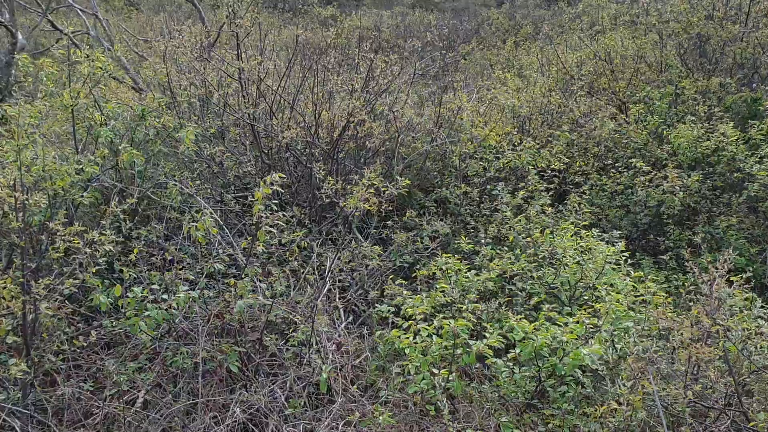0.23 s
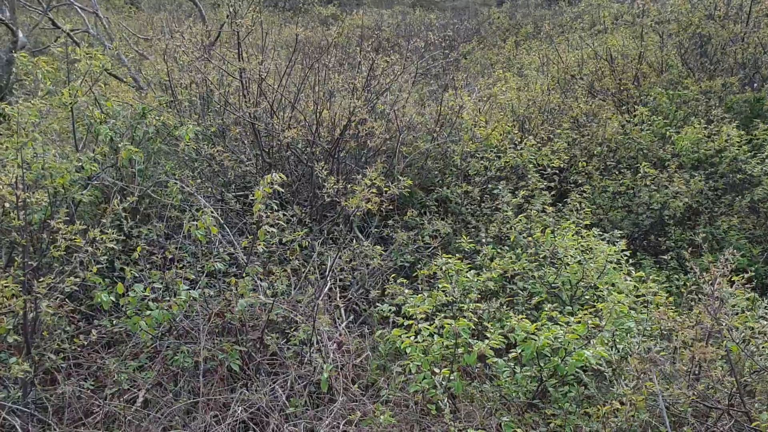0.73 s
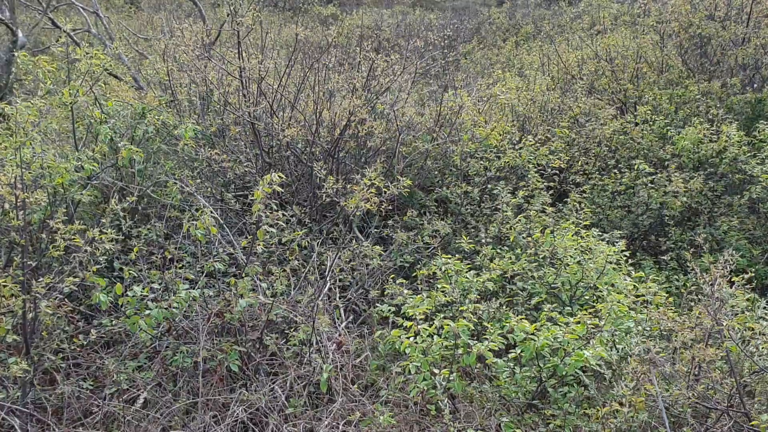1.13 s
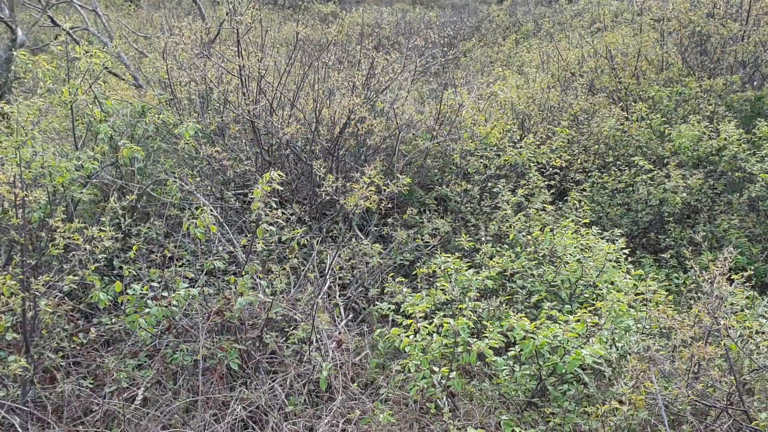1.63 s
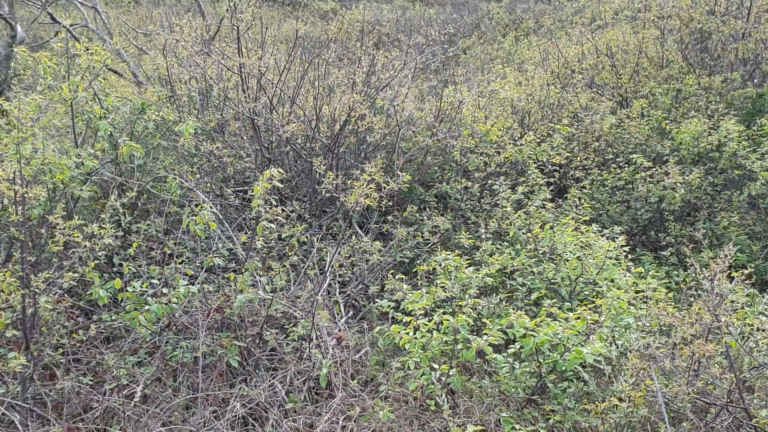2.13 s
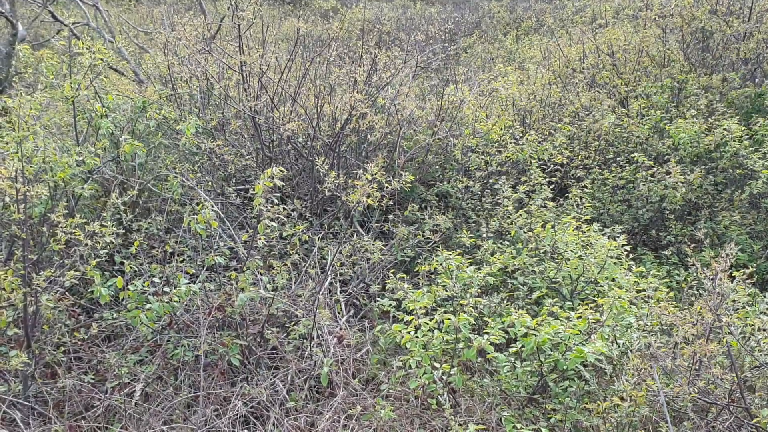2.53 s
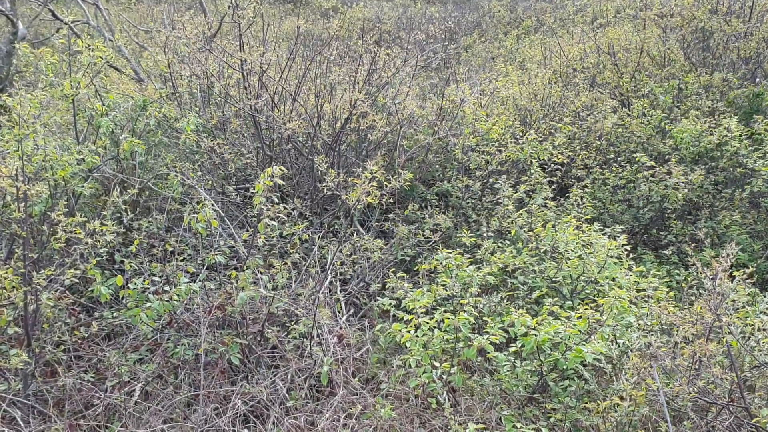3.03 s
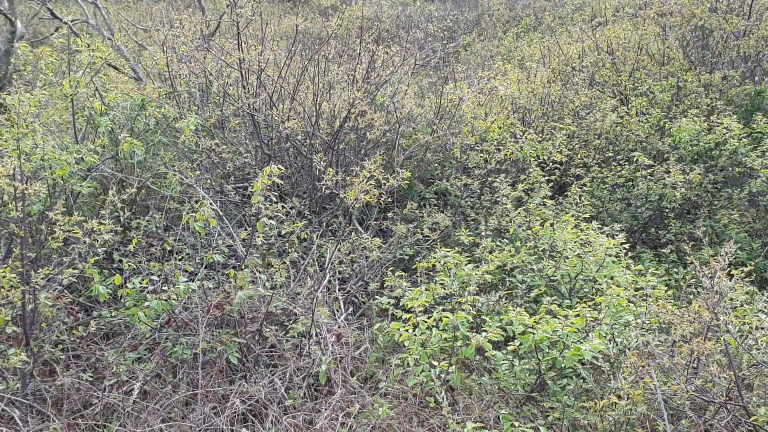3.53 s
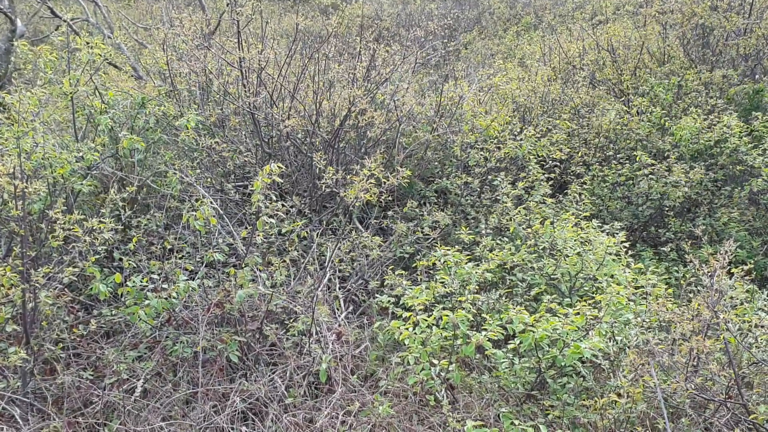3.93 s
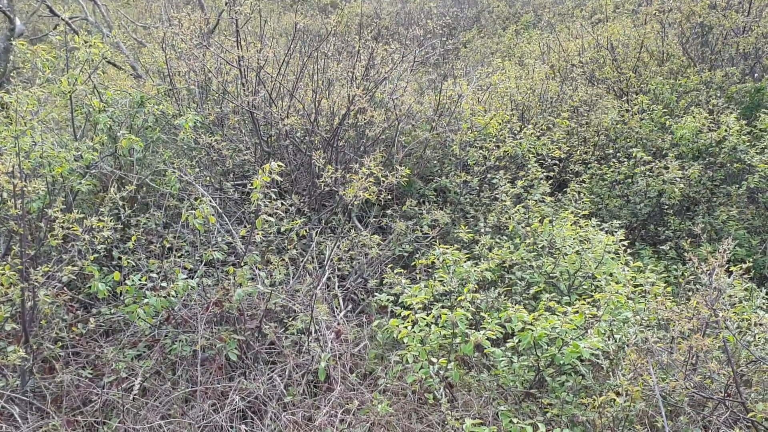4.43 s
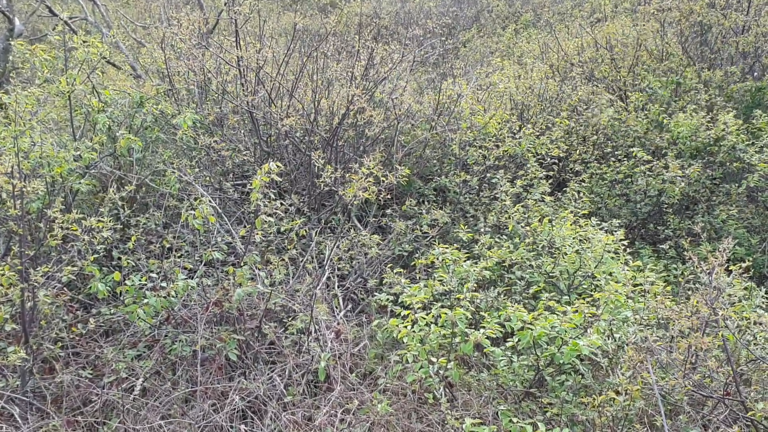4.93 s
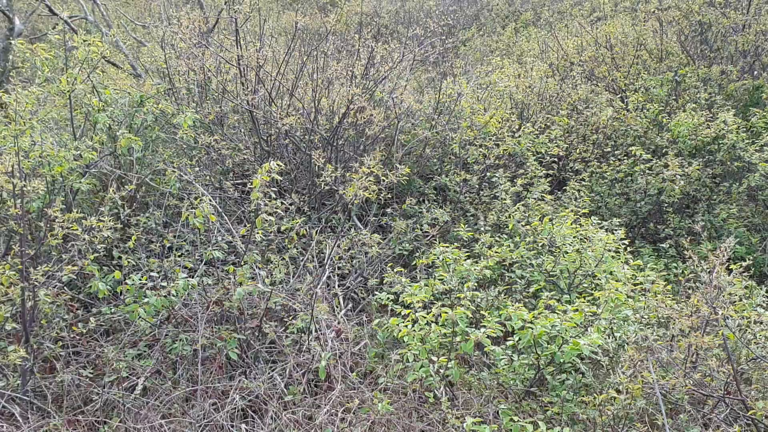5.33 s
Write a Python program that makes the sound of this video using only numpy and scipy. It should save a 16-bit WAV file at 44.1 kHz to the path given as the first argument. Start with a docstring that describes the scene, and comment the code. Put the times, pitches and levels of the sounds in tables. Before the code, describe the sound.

Gusty low wind buffeting, then a brief loud nightingale phrase with three slide-and-buzz repeats, followed by sparse faint distant birds.

```python
"""A nightingale sings slightly to the right: gliding near-sines make its whistles, slides, hooks and warbled arches,
and pulsed stacks of partials make its buzzes. Ground, bank and dense scrub send the notes back.
Fainter birds call farther off, made of short glides and whistles that waver.
Gusty wind buffets the two microphone ports as shaped noise and ringing pops, over a thin noise hiss."""
import sys
import numpy as np
from scipy import signal
from scipy.fft import rfft, irfft, next_fast_len
from scipy.io import wavfile
from scipy.ndimage import uniform_filter1d

SR = 44100
rng = np.random.default_rng(int(sys.argv[2]) if len(sys.argv) > 2 else 0)


def waveform_to_disk(signal):
    """Save audio, clipped to [-1, 1], as 16-bit WAV at the path in sys.argv[1]."""
    frames = np.transpose(np.atleast_2d(signal))
    scaled = np.clip(frames, -1, 1) * 32767
    samples = np.round(scaled).astype(np.int16)
    wavfile.write(sys.argv[1], SR, samples)


def amplitude_ratio(level_db):
    """Convert a level in decibels to the matching linear amplitude (field) ratio."""
    exponent = np.asarray(level_db, float) / 20
    return 10 ** exponent


N = 246519


def rms_one(x):
    """Scale to unit rms."""
    return x / np.sqrt(np.mean(x ** 2) + 1e-20)


def drift(rate_hz, shape=(N,)):
    """Slow random wandering with spread 1: noise through two equal low-pass poles."""
    r = np.exp(-2 * np.pi * rate_hz / SR)
    return rms_one(signal.lfilter([1], [1, -2 * r, r * r], rng.standard_normal(shape)))


def coloured_noise(spectrum):
    """Separate noise in each channel, rms 1, shaped by a spectrum."""
    size = next_fast_len(N)
    hz, db = np.transpose(spectrum)
    log_hz = np.log(np.maximum(np.arange(size // 2 + 1) * SR / size, 1))
    gain = amplitude_ratio(np.interp(log_hz, np.log(hz), db, left=-90, right=-90))
    noise = rng.standard_normal((2, size))
    return rms_one(irfft(rfft(noise) * gain, size)[:, :N])


def delayed(x, s):
    """The sound, s seconds later."""
    return np.interp(np.arange(N) - s * SR, np.arange(N), x, left=0)


def add_note(out, start_s, hz, level, overtone_db):
    """The syrinx, a bird's voice organ: a near sine with an octave, laid in at its time."""
    i = round(start_s * SR)
    phase = 2 * np.pi * (np.cumsum(hz) / SR + rng.random())
    tone = np.sqrt(2) * level * (np.sin(phase) + amplitude_ratio(overtone_db) * np.sin(2 * phase))
    out[i:i + len(tone)] += tone[:N - i]


def note_curves(rows):
    """Time, second column, faded level and any further columns, sample by sample over a note."""
    s, values, db, *others = np.transpose(rows)
    t = np.arange(s[0], s[-1], 1 / SR)
    fade = np.clip(np.minimum(t - s[0], s[-1] - t) / .001, 0, 1)
    level = fade * amplitude_ratio(np.interp(t, s, db))
    return t, np.interp(t, s, values), level, *[np.interp(t, s, c) for c in others]


def whistles(notes, overtone_db):
    """Notes whose pitch and level glide from point to point."""
    out = np.zeros(N)
    for rows in notes:
        t, hz, level = note_curves(rows)
        add_note(out, t[0], hz, level, overtone_db)
    return out


def glides(rows, overtone_db):
    """Short notes on a straight pitch line, loudest in the middle."""
    out = np.zeros(N)
    for s, length, first_hz, last_hz, db in rows:
        u = np.linspace(-1, 1, round(length * SR))
        hz = first_hz + (last_hz - first_hz) * (1 + u) / 2
        add_note(out, s, hz, amplitude_ratio(db) * (1 - u ** 2), overtone_db)
    return out


def shaped(shape, rows):
    """One shared shape, stretched to each note's length and pitch range."""
    return [[(s + u * length, top - fall * (top - end), db + rel) for u, fall, rel in shape]
            for s, length, top, end, db in rows]


# A swelling whistle and a broad hook, one list each: (time [s], pitch [Hz], level [dB])
LONG_NOTES = [
    [(1.82, 1980, -73.5), (1.834, 2334, -48), (1.895, 2430, -42.5), (1.909, 2500, -61)],
    [(2.172, 1130, -69), (2.184, 1950, -41), (2.197, 1995, -38.5), (2.221, 2723, -34.5), (2.225, 2626, -33),
     (2.23, 1944, -34.5), (2.24, 1141, -59)],
]


def long_notes():
    """The singer's long notes, nearly pure tones."""
    return whistles(LONG_NOTES, overtone_db=-45.5)


# Faint lead-in, then a loud fall: (burst time [s], length [s], top pitch [Hz], end pitch [Hz], level [dB])
SLIDES = [(2.604, .035, 3353, 1866, -29.5), (2.983, 0.043, 3288, 2066, -29),
          (3.39, 0.031, 3150, 2096, -33.5)]
# Shape of a slide: (share of length [0-1, negative before the burst], share of fall [0-1, negative above top],
# relative level [dB])
SLIDE_SHAPE = [(-.58, 0.035, -43), (-.32, -0.4, -33), (-.1, -.15, -20.5), (0, -0.048, -0.5), (.55, .7, -6),
               (1, 0.97, -30)]


def slides():
    """Nearly pure tones that burst out and fall in pitch."""
    return whistles(shaped(SLIDE_SHAPE, SLIDES), overtone_db=-45.5)


# A climb, then a sudden drop: (drop time [s], climb lead [s], drop top [Hz], drop end [Hz], drop level [dB])
HOOKS = [(2.532, .029, 3517, 1745, -34), (2.908, 0.025, 3510, 2120, -38), (3.316, 0.025, 3000, 2000, -46)]
CLIMB_FROM_HZ, CLIMB_HZ_PER_S = 1440, 52000
CLIMB_SHARE, CLIMB_DB, DROP_S = 0.99, -10, .0105   # climb: share of the lead, level relative to the drop


def hooks():
    """The pitch climbs at a steady rate and breaks off just before the drop."""
    notes = []
    for s, lead, top, end, db in HOOKS:
        climb_s = CLIMB_SHARE * lead
        climb_end_hz = CLIMB_FROM_HZ + CLIMB_HZ_PER_S * climb_s
        notes.append((s - lead, climb_s, CLIMB_FROM_HZ, climb_end_hz, db + CLIMB_DB))
        notes.append((s, DROP_S, top, end, db))
    return glides(notes, overtone_db=-37.5)


# Short notes: (time [s], length [s], first pitch [Hz], last pitch [Hz], level [dB])
FLICKS = [(1.41, 0.035, 3540, 3420, -54.5), (1.455, .05, 4234, 4096, -49)]


def flicks():
    """Very short tones with a slight glide."""
    return glides(FLICKS, overtone_db=-51.0)


# Notes that shoot up and warble down: (time [s], top of pitch line [Hz], upstroke level [dB], warble level [dB])
ARCHES = [(1.968, 7480, -51.5, -45), (2.071, 7950, -40, -42.5)]
# Their two parts: (time after onset [s], height [0-1], relative level [dB], warble depth [Hz])
UPSTROKE = [(0, .2, -19.5, -5), (.004, .5, 3, -3), (.010, 1, -20.5, 87)]
DESCENT = [(.0245, .7, -10, 500), (.0345, 0.46, 2, 680), (.0455, .32, -10, 700), (.057, 0, -15.5, 550)]
ARCH_FOOT_HZ = 3150
WARBLE_PER_S, WARBLE_THROB = 152, 0.86   # cycles per second, level swing as a share


def arches():
    """Each warble cycle falls in pitch, snaps back and swells once."""
    out = np.zeros(N)
    for s, top, up_db, warble_db in ARCHES:
        rows = [(s + after, ARCH_FOOT_HZ + height * (top - ARCH_FOOT_HZ), db + rel, deep)
                for part, db in [(UPSTROKE, up_db), (DESCENT, warble_db)]
                for after, height, rel, deep in part]
        t, hz, level, depth = note_curves(rows)
        turn = 2 * np.pi * WARBLE_PER_S * (t - s - DESCENT[1][0])
        fall = -np.sin(turn) + 0.48 * np.sin(2 * turn)
        throb = 1 + WARBLE_THROB * np.cos(turn)
        add_note(out, t[0], hz + depth * fall, level * throb, overtone_db=-19.5)
    return out


# Pulse trains: (first pulse [s], last pulse [s], pulses [count], slowing [0-1], start level [dB],
# end level [dB], throat pitch at start [Hz], throat pitch at end [Hz], throat sweep in a pulse [Hz])
BUZZES = [(2.293, 2.436, 11, 0.2, -46, -53.5, 4600, 5600, 1946),
          (2.697, 2.823, 10, .01, -49.5, -57, 4310, 5570, 486),
          (3.093, 3.226, 11, 0.06, -54, -56.5, 6400, 6380, 297)]
# One pulse: (time after onset [s], share of the sweep [0-1], relative level [dB])
PULSE = [(0, 0, 0), (.002, .2, 3.5), (.0055, .7, -2), (.009, 1, -20)]
PARTIAL_SPACING_HZ, THROAT_WIDTH_HZ = 558.7, 390
PIP_DB, SKIRT_DB = -5, -8   # lagging low partial, broad band around the throat resonance
OPENING_SHARE = 0.32   # how fast the throat opens, as a share of the buzz


def buzzes():
    """Each pulse is a rough harmonic stack; the throat resonance sweeps up through it, a low partial lags."""
    out, order = np.zeros(N), np.arange(4, 28)[:, None]
    t, swept, level = note_curves(PULSE)
    for first, last, pulses, slowing, start_db, end_db, start_hz, end_hz, sweep_hz in BUZZES:
        for u in np.linspace(0, 1, round(pulses)):
            jitter, bend, loud, pip = rng.standard_normal(4)
            pulse_s = first + (last - first) * (u - slowing * u * (1 - u)) + 0.0001 * jitter
            i = round(pulse_s * SR)
            opening_hz = end_hz + (start_hz - end_hz) * np.exp(-(u / OPENING_SHARE) ** 2)
            throat_hz = opening_hz * (1 + 0.08 * bend) + sweep_hz * swept
            hz = order * PARTIAL_SPACING_HZ * (1 + 0.0044 * bend)
            throat = np.exp(-((hz - throat_hz) / THROAT_WIDTH_HZ) ** 2)
            skirt = amplitude_ratio(SKIRT_DB) * np.exp(-((hz - 5700) / 2100) ** 4)
            # louder buzzes are brighter
            treble = amplitude_ratio(1.58 * start_db + 52.5) * np.exp(-((hz - 11800) / 2200) ** 2)
            # even partials lead, each one by chance stronger or weaker
            uneven = amplitude_ratio(-5 * (order % 2) + 2.2 * rng.standard_normal(order.shape))
            partials = (throat + skirt + treble) * uneven
            partials[1] += amplitude_ratio(PIP_DB + 2.0 * pip) * np.sin(np.pi * t / t[-1]) ** 2
            # ragged cycles smear the high partials most
            unsteady = .0019 * np.cumsum(rng.standard_normal(len(t)))
            cycles = hz * t + order * unsteady + rng.random(order.shape)
            stack = np.sum(partials * np.sin(2 * np.pi * cycles), axis=0)
            pulse_db = start_db + (end_db - start_db) * u + 0.95 * loud
            out[i:i + len(t)] += amplitude_ratio(pulse_db) * level * stack
    return out


def add_breath(song):
    """Air rushing with each note: high-passed noise that follows the strength of the song."""
    highpass = signal.butter(4, 6000, "high", fs=SR, output="sos")
    air = signal.sosfilt(highpass, rng.standard_normal(N))
    return song + amplitude_ratio(-39.5) * air * uniform_filter1d(np.abs(song), size=128)


def singer():
    """The nightingale's syrinx and breath: all its kinds of note together."""
    return add_breath(long_notes() + slides() + hooks() + flicks() + arches() + buzzes())


def add_ground_echo(song):
    """The ground sends the sound back a little later, inverted."""
    return song - amplitude_ratio(-3.5) * delayed(song, 0.0027)


def add_bank_echo(song):
    """A bank sends back a weaker, later copy."""
    return song + amplitude_ratio(-21) * delayed(song, 0.012)


def placed(x, pan_db, lag):
    """Direction: a level difference (left over right) and a lag of the left channel in samples."""
    return np.array([amplitude_ratio(pan_db / 2) * delayed(x, lag / SR), amplitude_ratio(-pan_db / 2) * x])


def scrub(x, db, t60, alike, bright):
    """Countless moving twigs and leaves send back a dense, dying scatter, partly alike in both channels."""
    t = np.arange(SR // 2) / SR
    shared, left, right = rng.standard_normal((3, len(t)))
    scatter = np.sqrt(alike) * shared + np.sqrt(1 - alike) * np.array([left, right])
    tail = scatter * amplitude_ratio(-60 * t / t60) * np.clip(t / 0.0041, 0, 1)
    tail = signal.lfilter([1, -bright], [1], tail)   # small leaves throw back the short waves best
    tail = tail / np.sqrt(np.sum(tail ** 2) / 2)
    rustled = x * (1 + 1.2 * drift(87))
    return amplitude_ratio(db) * signal.fftconvolve(rustled[None], tail, axes=1)[:, :N]


# A bird's fall into a held whistle: (time [s], held pitch [Hz], fall level [dB], whistle level [dB],
# extra hold [s])
SWOOPS = [(4.909, 3704, -77.5, -64.5, 0.029), (5.19, 3823, -71, -53, 0.006), (5.421, 4012, -63, -52, .025)]
SWOOP_FROM, SETTLE_S, FALL_S = 0.65, 0.025, 0.041   # start above the held pitch (share), settling, fall
SWELL_AT_S, SWELL_DB_PER_S, STOP_DB_PER_S = 0.11, 600, 895
UPTURN = 0.064   # final rise, as a share of the held pitch per FALL_S
UPPER_VOICE_HZ, UPPER_VOICE_DB = 1130, -4   # above the main voice, relative to the fall


def swoops():
    """The pitch settles onto a whistle that swells and stops with an upturn; a hoarse higher voice shadows the fall."""
    out, t = np.zeros(N), np.arange(SR // 5) / SR
    for s, held_hz, fall_db, whistle_db, hold_s in SWOOPS:
        late = np.maximum(t - SWELL_AT_S - hold_s, 0)
        early = np.maximum(SWELL_AT_S - t, 0)
        hz = held_hz * (1 + SWOOP_FROM * np.exp(-t / SETTLE_S) + UPTURN * late / FALL_S)
        fall = amplitude_ratio(fall_db) * np.sin(np.pi * np.minimum(t / FALL_S, 1))
        swell = amplitude_ratio(whistle_db - SWELL_DB_PER_S * early - STOP_DB_PER_S * late)
        add_note(out, s, hz, fall + swell, overtone_db=-38)
        upper_hz = hz + UPPER_VOICE_HZ + 500 * drift(400, shape=t.shape)
        upper_level = amplitude_ratio(UPPER_VOICE_DB) * fall * (t < .04)
        add_note(out, s + 0.0033, upper_hz, upper_level, overtone_db=-41.5)
    return out


# Low two-part calls: (time [s], length [s], first pitch [Hz], last pitch [Hz], level [dB])
LOW_CALLS = [(4.257, 0.016, 1350, 1380, -71.5), (4.587, 0.065, 1405, 1360, -68.5)]


def low_calls():
    """Low tones with a strong octave."""
    return glides(LOW_CALLS, overtone_db=-4.0)


# Warbled figures: (time [s], length [s], top pitch [Hz], bottom pitch [Hz], level [dB])
FIGURES = [(0.506, .123, 4540, 2750, -64), (0.716, 0.11, 4470, 2480, -62.5)]
# Their shape, down, up and down again: (share of length [0-1], share of fall [0-1], relative level [dB])
FIGURE_SHAPE = [(0, 0, -20), (.1, 0.55, -11), (.2, .76, -8), (.27, 0.64, -37), (.34, .95, -15),
                (.42, 0.78, -8), (.52, .04, -2.5), (.6, 0.25, -27), (.64, 0.33, -2), (.9, 0.82, 1),
                (1, .97, -16)]


def figures():
    """Nearly pure tones that run through one shared warble."""
    return whistles(shaped(FIGURE_SHAPE, FIGURES), overtone_db=-38)


# Distant single notes: (time [s], length [s], first pitch [Hz], last pitch [Hz], level [dB])
FAR_NOTES = [ (.2, 0.033, 4630, 5300, -87), (0.307, 0.23, 8250, 7650, -82.5),
             (0.385, 0.031, 4390, 5240, -71), (0.944, 0.038, 2650, 3430, -69.5),
             (.98, 0.013, 4600, 4050, -74), (.985, 0.02, 2360, 1990, -70), (1.06, 0.035, 3500, 4270, -75),
             (1.103, 0.041, 2530, 3610, -69), (1.13, 0.043, 2540, 1930, -72),
             (1.245, 0.044, 5300, 5800, -78), (1.34, 0.022, 6230, 4700, -78),
             (1.5, 0.078, 2280, 2060, -75.5), (1.595, 0.13, 3344, 3690, -75), (1.62, 0.16, 4100, 3990, -80),
             (1.669, 0.049, 1258, 1504, -68), (3.44, 0.2, 3090, 2660, -86), (3.71, 0.19, 5260, 4600, -93),
             (4.85, 0.09, 4270, 4600, -107), (5.1, 0.038, 4480, 4380, -89), (5.145, 0.05, 4450, 3620, -84),
             (5.49, 0.028, 2860, 3400, -78), (5.572, 0.033, 4300, 4660, -75)]


def far_notes():
    """Single whistles, three rising peeps and a harsh chatter of paired rising tones."""
    peeps = [(4.32 + .2 * k, .045, 5550, 6250, -89) for k in range(3)]
    chatter = [(1.172 + 0.044 * k, .025, hz, 1.33 * hz, db)
               for k in range(3) for hz, db in [(1750, -74.5), (2650, -67.5)]]
    return glides(FAR_NOTES + peeps + chatter, overtone_db=-45)


# Distant twitter: (time [s], rate [chirps per s])
TWITTER = [(0, 1500), (1.32, 3000), (1.42, 0)]


def twitter():
    """A haze of faint chirps at random times, pitches and slopes."""
    t = np.arange(N) / SR
    starts = t[rng.random(N) < np.interp(t, *np.transpose(TWITTER)) / SR]
    pitch, slope = rng.random((len(starts), 2)).T
    hz = 1700 * 4.5 ** pitch
    chirps = [(s, .012, f * (1.1 - 0.2 * k), f * (1.0 + 0.28 * k), -96) for s, f, k in zip(starts, hz, slope)]
    return glides(chirps, overtone_db=-45)


def far_birds():
    """Distant calls and twitter, all wavering in level on their way through the leaves."""
    return (low_calls() + figures() + far_notes() + twitter()) * (1 + 0.53 * drift(130))


# Microphone dip and lift in the treble: (centre [Hz], width [Hz], gain [dB])
CAPSULE = [(9000, 670, -3), (12500, 1500, 7)]


def capsule(x):
    """The microphone's colour in the treble, as smooth bumps in its frequency response."""
    size = next_fast_len(N + 1024)
    f = np.arange(size // 2 + 1) * SR / size
    response_db = sum(db * np.exp(-((f - hz) / width) ** 2) for hz, width, db in CAPSULE)
    return irfft(rfft(x, size) * amplitude_ratio(response_db), size)[:, :N]


# Sharp pops of wind: (time [s], typical level before the quick onset and decay [dB], ringing pitch [Hz])
POPS = [(.0885, -20, 340), (.497, -29, 420), (.574, -29, 380), (1.381, -27, 310), (1.777, -28, 260)]
POP_T60_S = 0.037


def pops():
    """Each pop is a sudden push that rings briefly, with another strength and phase in each port."""
    out, t = np.zeros((2, N)), np.arange(SR // 10) / SR
    for s, db, hz in POPS:
        loud, turn = rng.standard_normal((2, 2, 1))
        level = amplitude_ratio(db + 2.8 * loud - 60 * t / POP_T60_S) * np.minimum(t / 0.0011, 1)
        ring = np.sin(2 * np.pi * hz * t + turn / 2)
        out[:, round(s * SR):][:, :len(t)] += level * ring
    return out


# Base level of the wind on the ports: (time [s], level [dB])
GUSTS = [(0.0, -36), (0.08, -32.5), (0.15, -46), (0.2, -34.5), (0.65, -30.5), (0.68, -38), (1.54, -40.5),
         (1.65, -50.5), (1.82, -31.5), (1.87, -56.5), (2.6, -34.5), (2.86, -48.5), (3.13, -44.5),
         (3.35, -61), (3.44, -41), (3.78, -53.5), (4.2, -37), (4.39, -42.5), (4.45, -34.5), (4.48, -40),
         (5.08, -43), (5.28, -56.5), (5.34, -38), (5.46, -32), (5.51, -53), (5.59, -50)]
# Single buffets on top: (time [s], level added to the thud [dB], level added to the flutter [dB])
BUFFETS = [(0.09, 11.5, 9.5), (0.269, 10, -7), (2.23, 10.5, 0), (2.992, 12.5, 2)]
# Spectra of the low thud, the sharper flutter and the rasp: (frequency [Hz], relative level per Hz [dB])
THUD = [(20, -34), (35, -9.5), (65, -0.5), (160, -9), (400, -42)]
FLUTTER = [(120, -15.5), (220, 2), (380, 0), (520, -12), (800, -36)]
RASP = [(350, -30.5), (550, 0), (800, -12.5), (1200, -30.5)]
BUFFET_S = 0.013
# flutter against thud: offset, growth in dB per dB of wind above the calm level
FLUTTER_DB, FLUTTER_GROWTH, CALM_DB = -10.5, 0.49, -49


def wind():
    """Eddies hit each port in lumps; the flutter is sharper, and strong flutter grows a rasp on top."""
    t = np.arange(N) / SR
    gust_db = np.interp(t, *np.transpose(GUSTS))
    s, *added_db = np.transpose(BUFFETS)
    buffets = np.exp(-((t - s[:, None]) / BUFFET_S) ** 2)
    thud_db, flutter_db = gust_db + np.array(added_db) @ buffets
    around_db = uniform_filter1d(gust_db, size=SR)   # mean wind over the second around each moment
    flutter_db = flutter_db + FLUTTER_DB + FLUTTER_GROWTH * (around_db - CALM_DB)
    # partly shared by the two ports
    eddies = .5 * drift(25) + drift(36.0, shape=(2, N)) + 0.5 * drift(9.7)
    lumps_db = np.minimum(3.75 * eddies + 4.85 * drift(45, shape=(2, N)), 11)
    thud = amplitude_ratio(thud_db) * rms_one(coloured_noise(THUD) * amplitude_ratio(3.4 * eddies))
    flutter = amplitude_ratio(flutter_db) * rms_one(coloured_noise(FLUTTER) * amplitude_ratio(lumps_db))
    rasp = amplitude_ratio(1.646 * flutter_db + 9.0) * rms_one(coloured_noise(RASP) * amplitude_ratio(2.1 * lumps_db))
    lowpass = signal.butter(2, 1100, fs=SR, output="sos")
    return signal.sosfilt(lowpass, thud + flutter + rasp + pops())


# Spectrum of the hiss: (frequency [Hz], relative level per Hz [dB])
HISS = [(350, -37), (600, 0), (1030, -12.5), (1400, -9), (2470, -18), (7550, -28.5), (8890, -31),
        (11800, -21.5), (15500, -22)]


def hiss():
    """A thin, steady noise, separate in each channel."""
    return amplitude_ratio(-72) * coloured_noise(HISS)


def scene():
    """The singer with its echoes and scatter, the far birds, wind and hiss."""
    song = add_ground_echo(singer())
    near = placed(add_bank_echo(song), pan_db=-2.5, lag=2.1)
    near = near + scrub(song, db=-16.5, t60=0.31, alike=0.26, bright=.1)
    near = near + scrub(song, db=-6, t60=0.14, alike=0.37, bright=0.85)
    far, caller = far_birds(), swoops()
    distant = placed(far, pan_db=-10.0, lag=1) + placed(caller, pan_db=0.0, lag=2.3)
    distant = distant + scrub(far + amplitude_ratio(-7.0) * caller, db=0, t60=0.2, alike=0.31, bright=0.14)
    return capsule(near + distant) + wind() + hiss()


def roll_off(x):
    """The treble ends steeply here."""
    return signal.sosfilt(signal.butter(12, 15690, fs=SR, output="sos"), x)


def record(dry):
    """Turns the finished mix into the sound that is written out."""
    return roll_off(dry)


dry = scene()
out = record(dry)
waveform_to_disk(out)
```